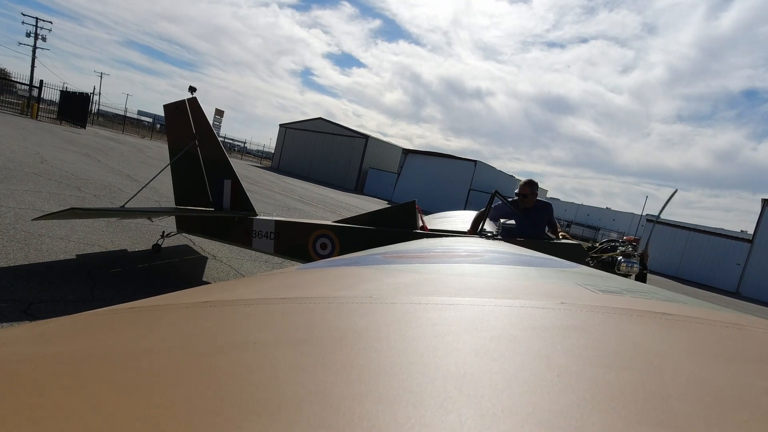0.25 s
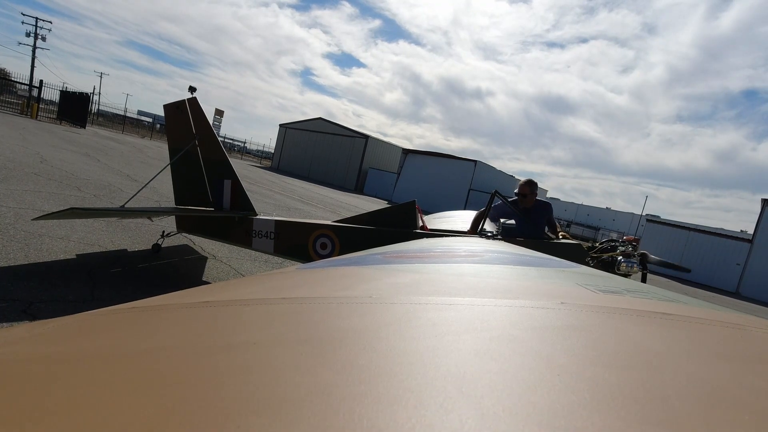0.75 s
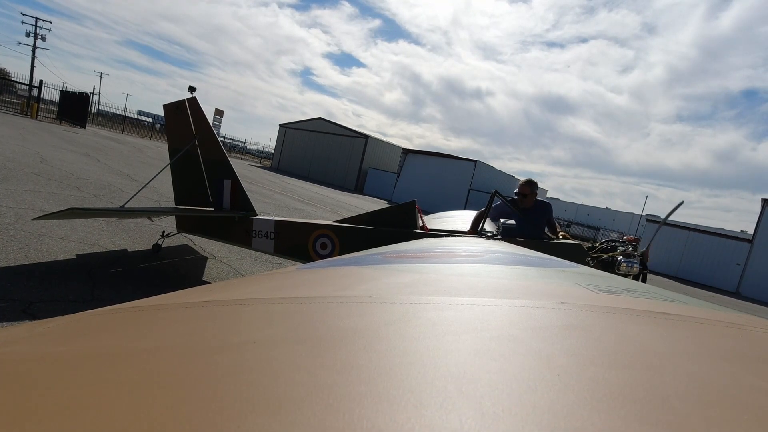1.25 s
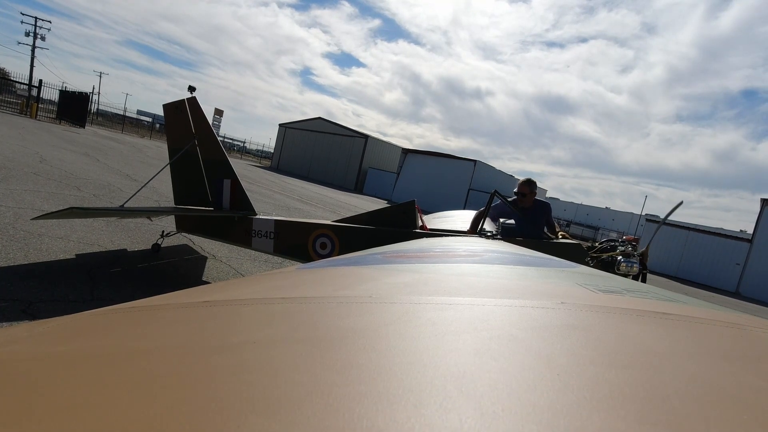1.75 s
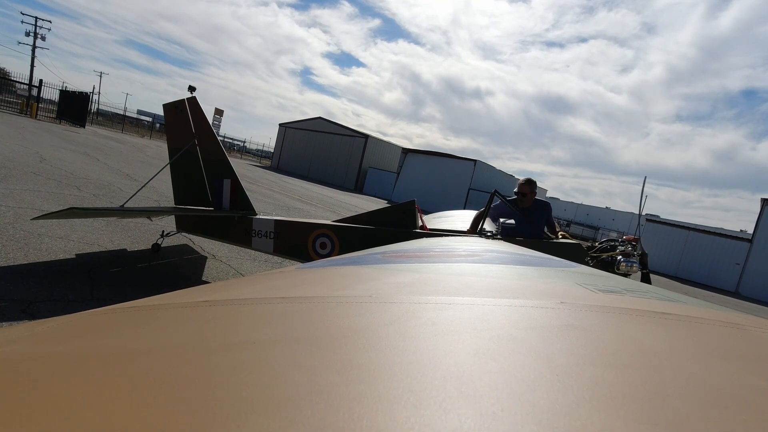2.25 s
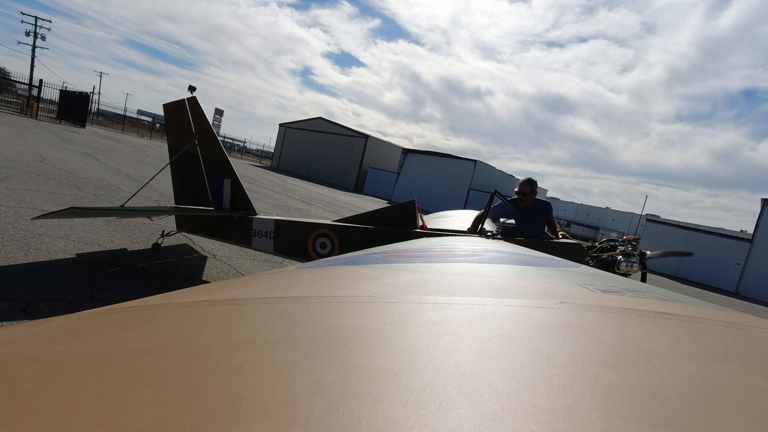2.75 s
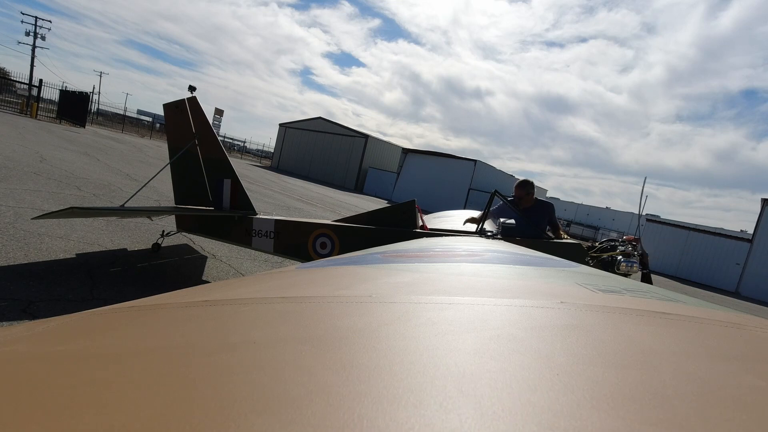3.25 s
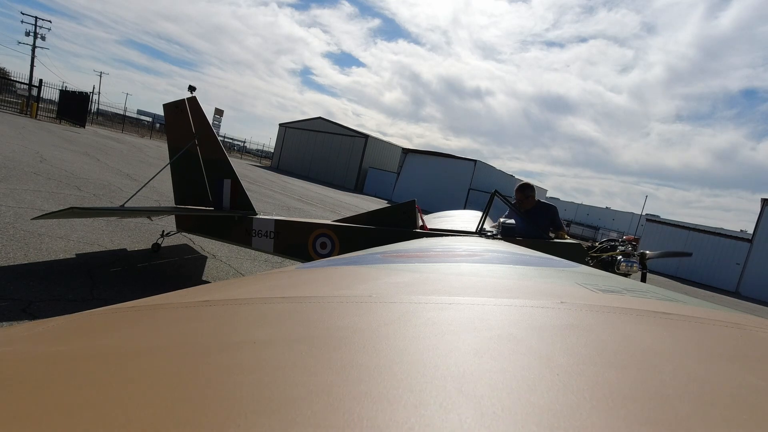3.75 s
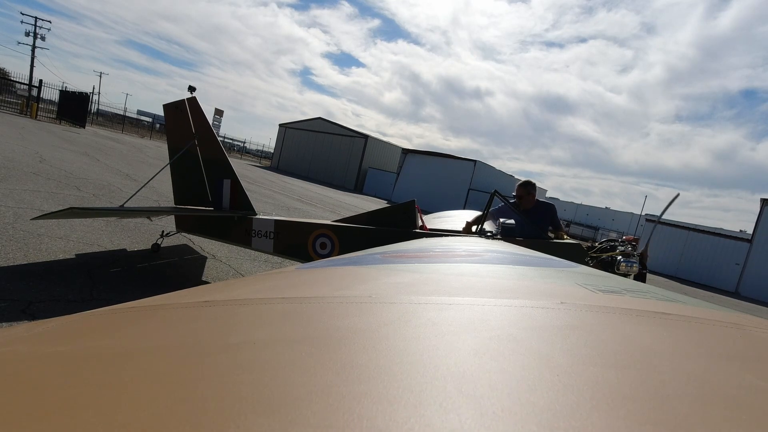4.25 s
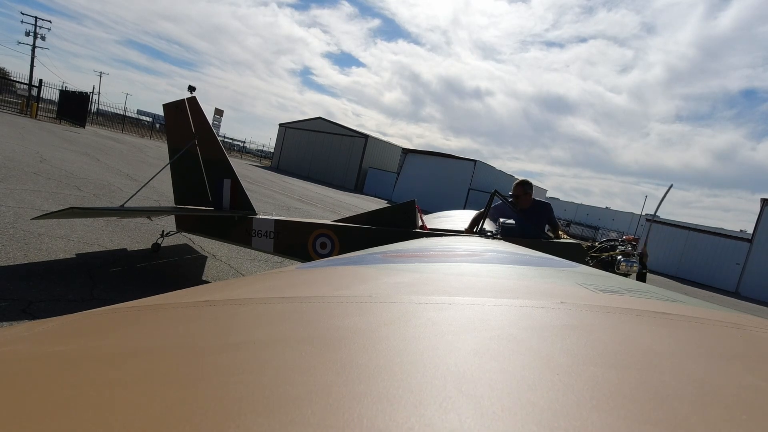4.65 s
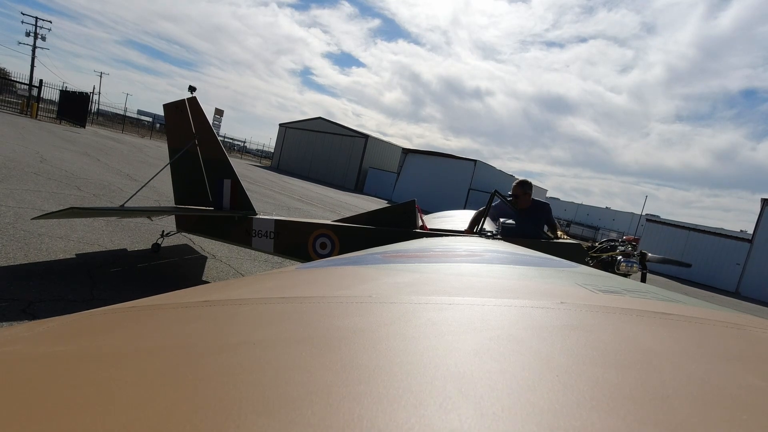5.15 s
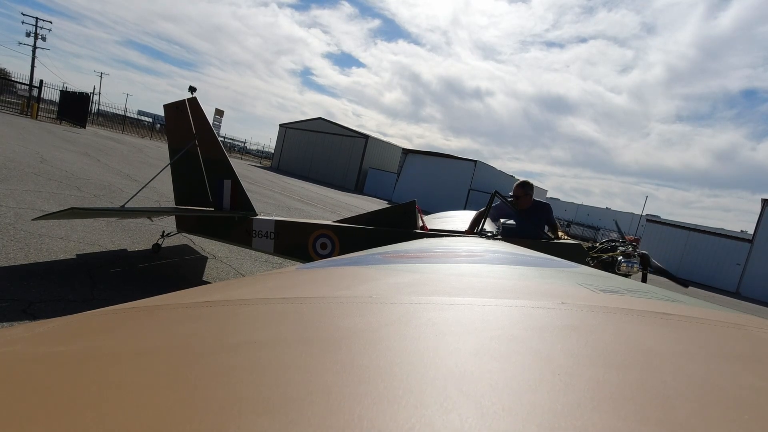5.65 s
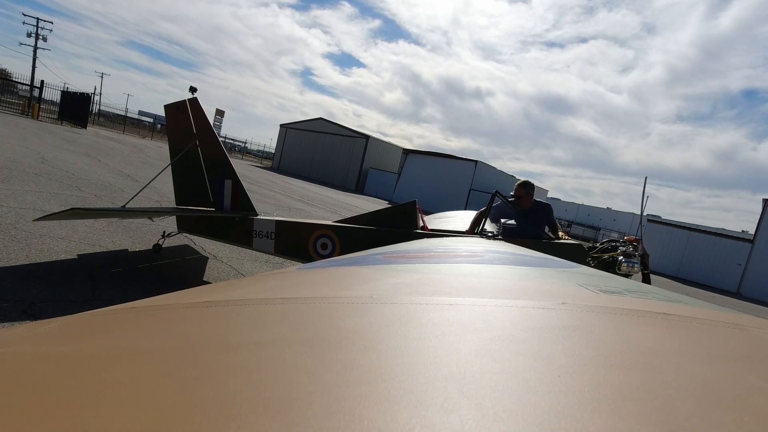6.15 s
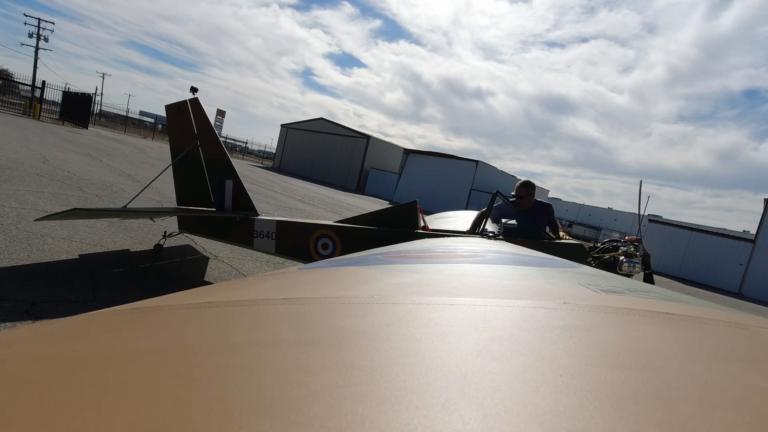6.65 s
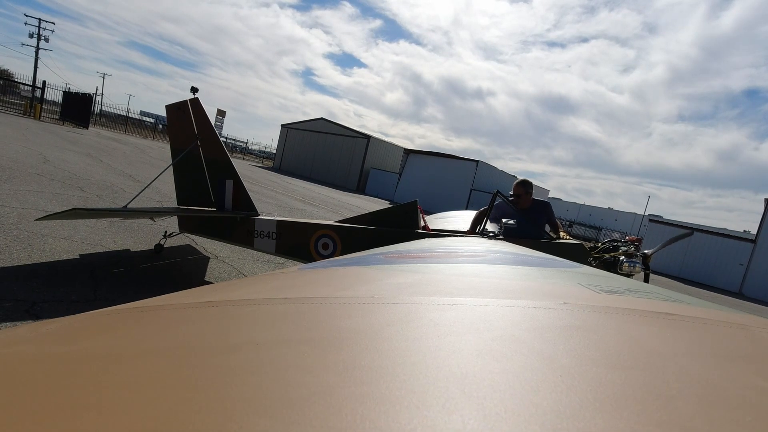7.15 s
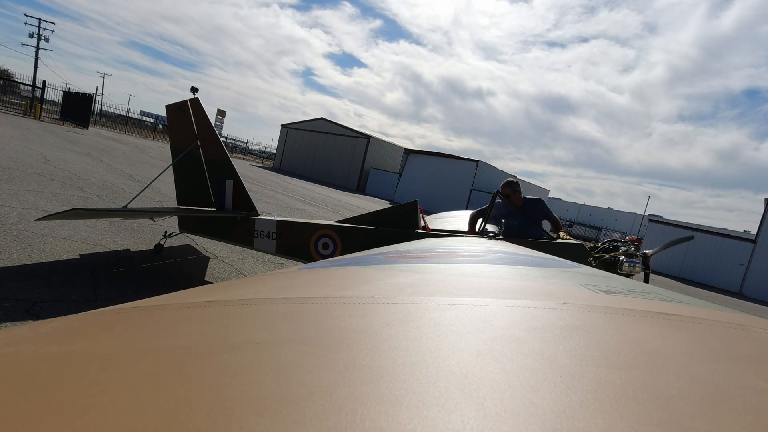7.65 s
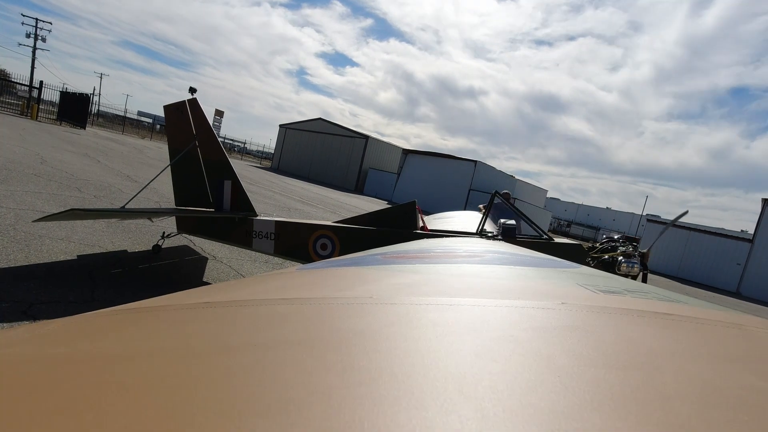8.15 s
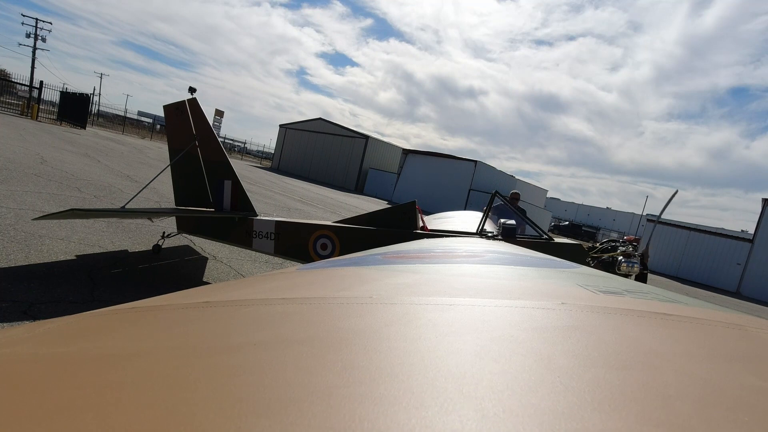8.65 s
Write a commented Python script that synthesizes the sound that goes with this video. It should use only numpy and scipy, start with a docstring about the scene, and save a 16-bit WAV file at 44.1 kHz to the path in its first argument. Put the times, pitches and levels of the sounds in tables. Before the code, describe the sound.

A small two-cylinder aircraft engine idles on an open apron, heard from the wing tip in dry, wide stereo, arriving slightly earlier on the right. From 0 to about 5.3 s it runs at a fairly steady, slightly wavering 21 to 23 firings a second: low throbbing exhaust thumps, puffs of gas, fine valve ticks, a low shaft hum and soft turbulent propeller wash. Hard metallic knocks and bright pings stand out irregularly. From about 5.5 s it sags, reaching roughly 15 beats a second by 6.5 s; thumps become deeper, uneven and more separate, gas noise thins, and a hollow knock accompanies nearly every beat. It stays slow and lumpy until 8.19 s, when the sound cuts abruptly to a faster, louder idle of about 19 beats a second, with surging midrange roar, high metallic whistle, dense crackle, knocks and strong pings until the end at 8.9 s.

```python
"""Two-cylinder aircraft engine idling

Idle on an open apron, heard at a wing tip, engine to the right. The cylinders fire in turn, one firing a turn.
Each firing rings the pipes, rushes gas and ticks the valves; propeller wash, whistle and hum lie under it.
Resonators make the solid sounds, shaped noise the moving air. Hard knocks and pings stand out of the beat.
The idle sags; at 8.19 s the sound cuts abruptly to a faster, louder idle with a roar and a metallic crackle."""
import sys
import numpy as np
from scipy import signal
from scipy.fft import rfft, irfft, next_fast_len
from scipy.io import wavfile
from scipy.ndimage import uniform_filter1d

SR = 44100
rng = np.random.default_rng(int(sys.argv[2]) if len(sys.argv) > 2 else 0)


def persist_wave(psi):
    """Save psi, clipped to +-1, as 16-bit WAV."""
    counts = np.round(np.clip(psi, -1, 1) * 32767).astype(np.int16)
    wavfile.write(sys.argv[1], SR, np.atleast_2d(counts).T)


N = 392931


def amp(db):
    """dB to amplitude factor."""
    return 10 ** (np.asarray(db) / 20)


def unit(x):
    """Scale to RMS 1."""
    return x / np.sqrt(np.mean(x ** 2) + 1e-20)


def along(points, x):
    """(x, value) points, interpolated on a log x axis."""
    at, value = np.transpose(points)
    return np.interp(np.log(x + 1), np.log(at + 1), value)


def curves(rows):
    """One value per sample for each column after the time."""
    s, *cols = np.transpose(rows)
    return [np.interp(np.arange(N) / SR, s, c) for c in cols]


def curves_at(rows, times_s):
    """The same curves, read at the given times."""
    return [c[(times_s * SR).astype(int)] for c in curves(rows)]


def filtered(x, response):
    """x times a complex response of frequency."""
    m = next_fast_len(N + SR // 2)
    return irfft(rfft(x, m) * response(np.fft.rfftfreq(m, 1 / SR)), m)[..., :N]


def train(times_s, sizes):
    """Single-sample impulses of the given sizes."""
    at = np.clip(np.round(times_s * SR).astype(int), 0, N - 1)
    return np.bincount(at, sizes, N)


def overlaid(at, rings):
    """Sum of rings, each sample at its own index."""
    return np.bincount(at.ravel(), rings.ravel(), N + SR)[:N]


def patchy(spectrum, patchy_db, wide, long):
    """Two noises of one colour that share patches of random gain."""
    z = signal.stft(rng.standard_normal((2, N)), nperseg=256)[2]
    field = rng.standard_normal(z.shape[1:])
    field = uniform_filter1d(uniform_filter1d(field, int(wide), 0), int(long), 1)
    pair = signal.istft(z * amp(patchy_db * unit(field)), nperseg=256)[1][:, :N]
    return unit(filtered(pair, lambda hz: amp(along(spectrum, hz))))


# crank speed: t/s, speed/rpm
SPEED = [(0.0, 1288.3), (0.3, 1279.0), (0.6, 1280.9), (0.9, 1321.7), (1.2, 1350.5), (1.5, 1313.2),
         (1.8, 1316.8), (2.1, 1347.3), (2.4, 1324.2), (2.7, 1352.7), (3.0, 1351.7), (3.3, 1365.3),
         (3.6, 1322.1), (3.9, 1363.5), (4.2, 1331.2), (4.5, 1332.1), (4.8, 1366.8), (5.1, 1365.4),
         (5.55, 1276.9), (5.75, 1155.0), (6.0, 1206.6), (6.25, 1053.9), (6.5, 910.1), (6.75, 1000.2),
         (7.0, 931.0), (7.25, 899.8), (7.5, 943.2), (7.75, 996.8), (8.0, 896.0), (8.16, 1073.5),
         (8.2, 1188.6), (8.45, 1152.6), (8.7, 1122.9), (8.91, 1192.4)]
# firing details: t/s, second cylinder's delay/turn (first leads by as much), its extra gas level/dB,
# valve tick after firing/ms, extra level of upper pipe modes/dB, panel tilt/(dB/octave), gas burst after firing/ms
TIMING = [(0, 0.02, -2.5, 2.5, -7.5, -6, -5.5), (5.5, 0.029, -5.5, 0.5, -8, -5.5, -5.5),
          (6.4, 0.017, -3.5, 4, -8, 5.5, -5.5), (8.17, 0.016, -13, -3, -3.5, 9, -4.5),
          (8.185, 0.012, -27.5, -18.5, -3, -6, -11), (8.91, 0.027, -20, -10.5, -5.5, -10, -15)]
CUT_S = 8.188  # abrupt cut to the faster, louder idle


def crank():
    """Integrated speed: turns made, firing times, cylinder (1 = second)."""
    turns = np.cumsum(curves(SPEED)[0]) / 60 / SR - .72
    late = curves(TIMING)[0]
    whole = np.arange(int(turns[-1]) + 1)
    second = 1 - whole % 2
    even = np.interp(whole, turns, np.arange(N))
    second = second ^ (even > CUT_S * SR)  # strong and weak firings trade places at the cut
    shift = late[even.astype(int)] * (2 * second - 1)
    return turns, np.interp(whole + shift, turns, np.arange(N) / SR), second


# uneven firings in the sag: t/s, level/dB
UNEVEN = [(6.5525, -2), (6.6168, -4.5), (6.7407, -3), (6.8, -0.5), (7.9443, 0.5), (8.138, 1)]


def strength(fired):
    """Level offset of each firing, dB; uneven ones are weaker or stronger."""
    s, db = np.transpose(UNEVEN)
    return (db * (np.abs(fired[:, None] - s) < .02)).sum(axis=1)


# engine load: t/s, load/dB
LOAD = [(0, 0.5), (1.0, 0.5), (5.3, 1), (5.75, -0.5), (6.25, -0.5), (6.5, -4), (7.0, -3), (7.2, -3),
        (7.5, -2.5), (7.9, -3), (8.17, -4.5), (8.19, -1.5), (8.5, -0.5), (8.8, -2.5), (8.91, -0.5)]
# thump, gas, wash, whistle: level at zero load/dB, growth/(dB/dB load), step at the cut/dB, later drift/(dB/s)
LAYERS = [(-46.5, 1.9, 3.5, 4), (-57, 3, -4.5, 9), (-53.5, 0.63, 2, 3), (-88.5, 10.5, 37, 4)]


def levels():
    """Each layer follows load by its own measure and steps at the cut."""
    load_db, = curves(LOAD)
    since = np.arange(N) / SR - CUT_S
    return [idle_db + grows * load_db + (since > 0) * (step_db + drift_db * since)
            for idle_db, grows, step_db, drift_db in LAYERS]


WHINE_HZ, WHINE_WIDTH_HZ, WHINE_DB = 1090, 31, -79.5


def whine():
    """Noise through one narrow resonance: a faint, wavering tone."""
    def mode(hz):
        damping = 1j * hz * WHINE_WIDTH_HZ
        return (damping / (WHINE_HZ ** 2 - hz * hz + damping)) ** 2
    return amp(WHINE_DB) * unit(filtered(rng.standard_normal(N), mode))


# metal whistle spectrum: f/Hz, relative level/dB
WHISTLE = [(8400, -64), (8950, -28), (9290, -4), (9620, -30), (10200, -54), (10900, -36), (11250, -17),
           (11700, -38), (12100, -26), (12500, -40), (13200, -23), (13670, -21), (14100, -60)]


def whistle(level_db):
    """Metal whistle: noise peaking in several high bands."""
    return amp(level_db) * patchy(WHISTLE, patchy_db=2.5, wide=3, long=4)


# propeller wash spectrum: f/Hz, relative level/dB
WASH = [(90, -46), (170, -1.5), (260, -0.5), (450, -6), (816, -16.5), (1080, -19.5), (1220, -31),
        (1570, -20), (1940, -21), (5020, -16.5), (7180, -27.5), (9240, -23), (11400, -32.5), (14000, -30.5),
        (15800, -28)]
# wash swell: speed/rpm, swing each way/dB
PULSE = [(900, 2), (1150, 0.5), (1340, 0.5)]
PULSE_LAG_TURNS = 0.15


def wash(level_db, turns):
    """Propeller wash: turbulent noise that swells once a turn."""
    swing_db = along(PULSE, curves(SPEED)[0])
    swell_db = swing_db * np.cos(2 * np.pi * (turns - PULSE_LAG_TURNS))
    return amp(level_db + swell_db) * patchy(WASH, patchy_db=3.0, wide=5.7, long=11)


# midrange roar spectrum: f/Hz, relative level/dB
ROAR = [(200, -70), (530, -16), (900, 2), (1290, -0.5), (1430, -0.5), (2270, -1), (2840, -4), (3400, -15),
        (3940, -1.5), (4500, 2), (5100, -18), (6050, -1), (7200, -38), (9100, -50), (15400, -120)]
ROAR_DB, ROAR_DB_PER_LOAD_DB = -59.5, 1.0
SURGE_OVER_KNOCK_DB, SURGE_T60_S = 41.0, 0.18


def roar():
    """Rough noise from the cut on; follows load, surges at every knock."""
    load_db, = curves(LOAD)
    s, db, _ = np.transpose(KNOCKS)
    t = np.arange(SR // 10) / SR
    swell = (1 - np.exp(-t / 0.0015)) * amp(-60 * t / SURGE_T60_S)
    surge = 1 + signal.fftconvolve(train(s, amp(db + SURGE_OVER_KNOCK_DB)), swell)[:N]
    running = np.arange(N) / SR > CUT_S
    level = running * amp(ROAR_DB + ROAR_DB_PER_LOAD_DB * load_db) * surge
    return level * patchy(ROAR, patchy_db=4.5, wide=3.5, long=3.5)


# crackle: t/s, level/dB
CRACKLE = [(8.19, -65), (8.24, -60), (8.4, -71), (8.5, -58), (8.6, -60), (8.7, -66), (8.85, -73),
           (8.91, -52)]
CRACKLE_HZ, CRACKLE_SPREAD_OCT, CRACKLE_T60_S, CRACKLE_SPREAD_DB = 3900, 0.36, 0.028, 2.5


def crackle(count=260):
    """Loose metal chatters after the cut: decaying sines at random times and pitches."""
    luck = rng.random((count, 3))
    t = np.arange(SR // 40) / SR
    hz = CRACKLE_HZ * 2 ** (CRACKLE_SPREAD_OCT * rng.standard_normal((count, 1)))
    size_db = -CRACKLE_SPREAD_DB * np.log(luck[:, :1])
    ring = amp(size_db - 60 * t / CRACKLE_T60_S) * np.sin(2 * np.pi * hz * t)
    start = CUT_S * SR + luck[:, 1:2] * (N - CUT_S * SR)
    grains = overlaid(start.astype(int) + np.arange(len(t)), ring)
    return amp(curves(CRACKLE)[0]) * grains / np.std(grains[int(CUT_S * SR):])


# shaft hum: t/s, peak of the twice-a-turn tone/dB, lead over the crank/turn
HUM = [(0, -48, 0.02), (0.8, -49.5, 0.02), (1.4, -54.5, 0), (5.4, -54.5, 0), (5.6, -50, 0.28),
       (6.05, -49, 0.28), (6.2, -72, 0.28), (8.18, -72, 0.28), (8.19, -46, 0.26), (8.65, -49, 0.29),
       (8.91, -47, 0.29)]
ONCE_DB = -10  # once-a-turn tone relative to the twice-a-turn one


def hum(turns):
    """Two pure low tones tied to the shaft."""
    level_db, lead = curves(HUM)
    angle = 2 * np.pi * (turns + lead)
    return amp(level_db) * (np.sin(2 * angle - .95) + amp(ONCE_DB) * np.sin(angle + 1.45))


# crankcase and cowling panel modes: f/Hz, relative level/dB, t60/s, second cylinder's extra level/dB
CASE = [(435, 3, 0.048, -1), (588, -8, 0.039, 14), (870, -5, 0.11, 4), (1086, -8, 0.2, 8.5),
        (1424, 2, 0.14, 3.5), (1608, 3, 0.069, -11), (1743, 4.5, 0.052, -17), (2065, 4.5, 0.12, 6),
        (2273, 1.5, 0.17, 3.5), (2454, 3, 0.13, 4), (2777, 1.5, 0.1, -8), (3240, 3.5, 0.08, -1),
        (3810, 8.5, 0.09, 1), (4143, 1.5, 0.034, 9), (4110, 4, 0.092, 11), (4940, 4.5, 0.066, 5),
        (5400, 9, 0.05, -6), (6100, -1, 0.043, 8)]
FLUTTER_DEPTH, FLUTTER_HZ = 0.45, 160


def panels(times, sizes_db, slope_db):
    """Each blow rings all panel modes at random delay, strength, pitch; loose panels buzz."""
    hz, db, t60, _ = np.transpose(CASE)[:, None, :, None]
    luck = rng.standard_normal((len(times), len(CASE), 3))
    t = np.arange(SR // 20) / SR
    pitch = hz * (1 + .01 * luck[..., :1])
    tilt_db = slope_db * np.log2(hz / 2500)
    fade = (1 - np.exp(-t / 0.000081)) * np.cos(np.pi / 2 * t / t[-1])
    level_db = db + tilt_db + sizes_db[..., None] + 2.5 * luck[..., 1:2]
    ring = amp(level_db - 60 * t / t60) * fade * np.sin(2 * np.pi * pitch * t)
    start = (times[:, None] + .004 * np.abs(luck[..., 2])) * SR
    slow = filtered(rng.standard_normal(N), lambda f: np.exp(-(f / FLUTTER_HZ) ** 2))
    return (1 + FLUTTER_DEPTH * unit(slow)) * overlaid(start.astype(int)[..., None] + np.arange(len(t)), ring)


# gas rush and knock crack spectrum: f/Hz, relative level/dB
GAS = [(150, -70), (350, -52), (600, -6), (1290, -7), (1420, -7.5), (1720, -11.5), (2110, -6.5),
       (2980, -15), (4740, -8), (7140, -21.5), (9140, -15), (15200, -26.5), (15800, -15)]
REBOUND_S = 0.011  # second jolt of each burst and knock
# hardest crankcase knocks: t/s, reference level/dB, pitch of the panel struck hardest f/Hz
KNOCKS = [(0.5442, -35, 2380), (0.6374, -35.5, 1080), (1.276, -48, 1710), (1.5913, -48, 2060),
          (1.634, -46, 2250), (1.727, -37.5, 2250), (1.818, -36, 2100), (2.585, -46, 1120),
          (2.6284, -42, 2210), (2.677, -44, 2090), (2.7157, -35, 1930), (2.766, -39, 2090),
          (3.0694, -36.5, 1600), (3.253, -36.5, 2080), (3.34, -48, 5500), (3.5129, -37, 2100),
          (3.608, -49, 5400), (3.695, -40, 2100), (3.788, -41, 2250), (3.8332, -34, 1290),
          (4.501, -42, 1430), (4.9023, -39, 1460), (5.035, -39, 1410), (5.2964, -43, 2090),
          (6.4158, -44, 5000), (6.548, -44.5, 2800), (6.6717, -42, 5400), (6.795, -65, 4040),
          (6.9162, -45, 2080), (7.0454, -41, 1590), (7.1776, -46, 2350), (7.3098, -42.5, 1690),
          (7.4385, -44, 2810), (7.5677, -47, 2810), (7.6899, -40, 3700), (7.8121, -42, 3700),
          (7.9399, -39, 1610), (8.0686, -46, 1600), (8.1928, -49, 3300), (8.2267, -35.5, 4100),
          (8.2776, -40, 2130), (8.3305, -37, 1990), (8.3814, -42, 6100), (8.4427, -35, 2810),
          (8.4861, -36, 1090), (8.539, -33.5, 4150), (8.5889, -40, 4400), (8.6507, -36.5, 1710),
          (8.7465, -42, 3870), (8.8004, -38.5, 1440), (8.8528, -33, 1450)]
# hollow ring relative to the knock: speed/rpm, level/dB
BODY = [(950, -5), (1100, -8), (1340, -20)]
BODY_HZ, BODY_T60_S, BODY_AFTER_S = 542, 0.036, 0.003
KNOCK_RING_DB, KNOCK_CRACK_DB, REBOUND_DB = -27, -9.5, -9.5  # rebound relative to the crack
FAVOURED_DB, FAVOURED_OCT = 9, 0.08  # lift and reach around the struck panel
KNOCK_TILT_DB_PER_OCT = -1.5


def knocks():
    """Hard blows: noise crack with rebound, hollow crankcase ring, panels ringing."""
    s, db, struck_hz = np.transpose(KNOCKS)
    away = np.log2(np.transpose(CASE)[0] / struck_hz[:, None]) / FAVOURED_OCT
    ring_db = db[:, None] + KNOCK_RING_DB + FAVOURED_DB * np.exp(-away ** 2)
    ring = panels(s, ring_db, KNOCK_TILT_DB_PER_OCT)
    t = np.arange(SR // 20) / SR
    crack_db = db + KNOCK_CRACK_DB
    blows = train(s, amp(crack_db)) + train(s + REBOUND_S, amp(crack_db + REBOUND_DB))
    gate = signal.fftconvolve(blows, (1 - np.exp(-t / 0.00085)) * amp(-60 * t / 0.023))[:N]
    crack = gate * unit(filtered(rng.standard_normal(N), lambda hz: amp(along(GAS, hz))))
    hollow = (1 - np.exp(-t / 0.0015)) * amp(-60 * t / BODY_T60_S) * np.sin(2 * np.pi * BODY_HZ * t)
    body_db = db + along(BODY, curves_at(SPEED, s)[0])
    body = signal.fftconvolve(train(s + BODY_AFTER_S, amp(body_db)), hollow)[:N]
    return ring + body + crack


# valve gear modes, separately driven lead mode first: f/Hz, relative level/dB, t60/s
GEAR = [(9336, -1.5, 0.0079), (9110, 19, 0.0043), (11000, 8, 0.0061), (11920, 7, 0.0089),
        (13300, 3, 0.0061), (13300, 4, 0.0044)]


def tick(main_db, rest_db, rise_s, scatter_db):
    """One metal contact: gear modes at random strengths plus a thin noise crack."""
    t = np.arange(SR // 25) / SR
    modes = []
    for hz, db, t60 in GEAR:
        decay = amp(db + rng.normal(0, scatter_db) - 60 * t / t60)
        modes.append(decay * np.sin(2 * np.pi * (hz * t + rng.random())))
    main, *rest = modes
    burst = rng.standard_normal(len(t) + 1)
    crack = 5.2 * (burst[1:] - 0.043 * burst[:-1]) * amp(-60 * t / 0.011)
    ring = amp(main_db) * main * (1 - np.exp(-(t / rise_s) ** 2))
    return ring + amp(rest_db) * (sum(rest) + crack) * (1 - np.exp(-t / 0.00033))


# regular valve ticks: speed/rpm, level/dB
TICKS = [(900, -68.5), (1050, -69), (1200, -64.5), (1285, -63.5), (1340, -59.5)]
# second cylinder's ticks: speed/rpm, extra level/dB
SECOND_TICK = [(950, -2), (1200, -3), (1340, 0)]
# hardest valve pings: t/s, drive of the lead mode/dB
PINGS = [(1.2326, -68), (1.277, -44), (1.3653, -26), (1.503, -40), (1.592, -34), (2.9423, -30),
         (2.9854, -47), (3.0745, -33), (3.3842, -34), (3.4301, -41), (3.5174, -50), (3.8776, -25),
         (4.1405, -60), (4.1856, -25), (4.4099, -51), (4.5025, -51), (4.5486, -30), (4.815, -40),
         (4.8579, -39), (4.9018, -65), (5.0345, -42), (5.08, -33), (5.1238, -39), (6.017, -37),
         (6.0686, -65), (6.122, -42), (6.1725, -36), (8.2766, -17), (8.3816, -29), (8.4342, -23),
         (8.486, -18), (8.538, -11.5), (8.5883, -15.5), (8.8528, -20)]
USUAL_PING_DB, PING_CRACK_DB, CRACK_DB_PER_PING_DB = -23, -53.5, 0.15  # crack drive, upper modes too


def valves(fired, second):
    """Two valves seat per firing, about 12 ms apart; some contacts ring much harder."""
    after = curves_at(TIMING, fired)[2] / 1000
    light, hard = np.zeros(N + SR), np.zeros(N + SR)
    extra_db = second * along(SECOND_TICK, curves_at(SPEED, fired)[0])
    for s, extra in zip(fired + after, extra_db):
        for delay, db in ((0, 11.6), (.012, 4)):
            one = tick(main_db=-6, rest_db=-7, rise_s=.0006, scatter_db=2.5)
            one = one * amp(db + extra + rng.normal(0, 2.5))
            light[int((s + delay + rng.normal(0, .0012)) * SR):][:len(one)] += one
    for s, db in PINGS:
        crack_db = PING_CRACK_DB + CRACK_DB_PER_PING_DB * (db - USUAL_PING_DB)
        one = tick(db, crack_db, rise_s=0.0015, scatter_db=3.5)
        hard[int(s * SR):][:len(one)] += one
    return amp(along(TICKS, curves(SPEED)[0])) * unit(light[:N]) + hard[:N]


RATTLE_DB = -5  # panels relative to the gas rush


def gas(fired, second):
    """Gas bursts, timed against each firing, gate turbulent noise and shake the panels."""
    t = np.arange(SR // 12) / SR
    puff = (1 - np.exp(-t / 0.0011)) * amp(-60 * t / 0.07)
    puff += (t > REBOUND_S) * amp(-8.5 - 60 * (t - REBOUND_S) / 0.3)
    _, extra_db, _, _, slope_db, after_ms = curves_at(TIMING, fired)
    size_db = extra_db * second + rng.standard_normal(len(fired))
    burst = fired + after_ms / 1000
    gate = signal.fftconvolve(train(burst, amp(size_db)), puff)[:N]
    rush = unit(gate * patchy(GAS, patchy_db=4.0, wide=2.7, long=4))
    panel_db = size_db[:, None] + second[:, None] * np.transpose(CASE)[3]
    return rush, unit(panels(burst, panel_db, slope_db[:, None, None]))


# pressure dip relative to the thump: speed/rpm, level before bass cut/dB
PULL = [(900, 11), (1150, 0), (1340, -8)]
PULL_AFTER_MS, PULL_WIDTH_MS = -1.05, 1.34


def pull(fired):
    """Sharp pressure dip as the exhaust valve cracks open; deepest bass of the beat."""
    speed = curves_at(SPEED, fired)[0]
    t = np.arange(-300, 301) / SR
    size_db = along(PULL, speed) + strength(fired) + rng.standard_normal(len(fired))
    blows = train(fired + PULL_AFTER_MS / 1000, amp(size_db))
    push = signal.fftconvolve(blows, -np.exp(-(1000 * t / PULL_WIDTH_MS) ** 2), "same")
    return filtered(push, lambda hz: 1j * hz / (35 + 1j * hz) * (hz > 24))


def chug(fired, second, upper_db):
    """The rising piston shrinks the cylinder: its air resonance glides up and dies."""
    luck = rng.standard_normal((len(fired), 3))
    t = np.arange(SR // 12) / SR
    turn = t * curves_at(SPEED, fired)[0][:, None] / 60
    rise_hz = (340 + 20 * second[:, None]) * (1 + .025 * luck[:, :1])  # pitch gained per turn
    cycles = np.cumsum(98 + rise_hz * turn, axis=1) / SR
    closing = np.cos(np.pi / 2 * np.clip(turn / .95, 0, 1))  # valve shuts before the turn is over
    late_db = -9.5 + upper_db[:, None] + luck[:, 1:2]
    swell = amp(-60 * t / 0.022) + amp(late_db) * np.sin(np.pi * np.clip(turn / 0.601, 0, 1))
    envelope = amp(luck[:, 2:] + strength(fired)[:, None]) * closing * swell * (1 - np.exp(-t / 0.0024))
    ring = -envelope * np.cos(2 * np.pi * cycles - 1.2)
    return unit(overlaid(((fired - .002) * SR).astype(int)[:, None] + np.arange(len(t)), ring))


# exhaust pipe and cowling modes: f/Hz, width/Hz, relative level/dB, second cylinder's extra/dB, after firing/ms
PIPES = [(49.2, 39.6, -4.5, -9.5, 1.4), (87, 42, -6.5, -20, 0.55), (118, 30, 0.5, 1.5, 1.29),
         (140.3, 33.1, 4, -2.5, 0.59), (228.7, 18, 2, -17.5, 6.14), (308.8, 32, -8, -11, 9.19),
         (361, 28, -12, -3, 6), (435.4, 70, -14, -10, 2.04), (568, 76, -16, -20, 0.28)]
# modes above 400 Hz: speed/rpm, extra level/dB
HIGH_PIPES = [(950, 2.3), (1150, 0.33), (1340, 0.11)]
# modes below 400 Hz: speed/rpm, extra level/dB
LOW_PIPES = [(900, -4), (1150, -3.5), (1340, -3.5)]
# gliding chug relative to the pipes: speed/rpm, level/dB
GLIDE = [(900, 2.5), (1150, 0.5), (1340, -0.5)]


def thump(fired, second):
    """Each firing rings every pipe mode at a random strength, plus the gliding chug."""
    luck = rng.standard_normal((len(fired), 2 * len(PIPES) + 1))
    upper_db = curves_at(TIMING, fired)[3]
    speed = curves_at(SPEED, fired)[0]
    high_db, low_db = along(HIGH_PIPES, speed), along(LOW_PIPES, speed)
    m = next_fast_len(N + SR // 2)
    f = np.fft.rfftfreq(m, 1 / SR)
    total = 0
    for k, (hz, width, db, extra_db, after_ms) in enumerate(PIPES):
        scatter_db = 1.1 * luck[:, -1] + .7 * luck[:, 2 * k]
        size_db = db + extra_db * second + strength(fired) + scatter_db
        size_db = size_db + upper_db * (hz > 180) + high_db * (hz > 400) + low_db * (hz < 400)
        wander_s = (.01 if hz < 180 else .05) / hz * luck[:, 2 * k + 1]
        mode = 1j * f * width / (hz * hz - f * f + 1j * f * width)
        blows = train(fired + after_ms / 1000 + wander_s, amp(size_db))
        total = total - rfft(blows, m) * mode ** 2  # squared: soft start
    exhaust = unit(irfft(total, m)[:N])
    exhaust = exhaust + amp(along(GLIDE, curves(SPEED)[0])) * chug(fired, second, upper_db)

    def open_air(hz):
        # apron bounce, 2.7 ms late, hollows out 185 Hz; open air carries no steady pressure
        ground = 1 + .6 * np.exp(-2j * np.pi * hz * .0027 - (hz / 700) ** 2)
        return ground * 1j * hz / (45 + 1j * hz) * hz ** 8 / (hz ** 8 + 48. ** 8)
    return unit(filtered(exhaust, open_air))


def scattered(x):
    """Wing, ground and fuselage: smeared over 30 ms, with a new random tail for each overlapping block."""
    t, hop = np.arange(int(.03 * SR)) / SR, SR // 8
    out = np.zeros(N + SR)
    for start in range(-hop, N, hop):
        part = x[max(start, 0):start + 2 * hop] * np.hanning(2 * hop)[max(-start, 0):N - start]
        tail = rng.standard_normal(len(t)) * amp(-60 * t / 0.012)
        smear = signal.fftconvolve(part, tail / np.linalg.norm(tail))
        out[max(start, 0):][:len(smear)] += smear
    return 2.05 * out[:N]


# left-right likeness without the lag: f/Hz, correlation/1
ALIKE = [(40, 0.998), (80, 1), (150, 1), (250, 0.98), (500, 0.98), (1000, 0.83), (2000, 0.89), (5000, 0.4),
         (15000, 0.22)]
LAG_S = 4 / SR


def ports(direct, spread):
    """Sound reaches the right port first; the spread part enters the ports with opposite sign."""
    turn = lambda hz: np.arccos(np.clip(along(ALIKE, hz), -1, 1)) / 2
    mid = filtered(direct, lambda hz: np.cos(turn(hz)))
    side = filtered(spread, lambda hz: np.sin(turn(hz)))
    lag = lambda hz: np.exp(-1j * np.pi * hz * LAG_S * np.array([[1], [-1]]))
    return filtered(np.array([mid + side, mid - side]), lag)


def scene():
    """Solid sounds are scattered by the airframe; air sounds are noise pairs."""
    thump_db, gas_db, wash_db, whistle_db = levels()
    turns, fired, second = crank()
    rush, rattle = gas(fired, second)
    air = whistle(whistle_db) + wash(wash_db, turns) + roar() + amp(gas_db) * rush
    solid = whine() + crackle() + hum(turns) + knocks() + valves(fired, second)
    solid += amp(gas_db + RATTLE_DB) * rattle
    solid += amp(thump_db) * (thump(fired, second) + pull(fired))
    return ports(solid + air[0], scattered(solid) + air[1])


TOP_HZ = 15760


def record(dry):
    """Steep band limit at TOP_HZ, 80 dB down above it."""
    return filtered(dry, lambda hz: 1 / (1 + (hz / TOP_HZ) ** 300) + 1e-4)


dry = scene()
out = record(dry)
persist_wave(out)
```